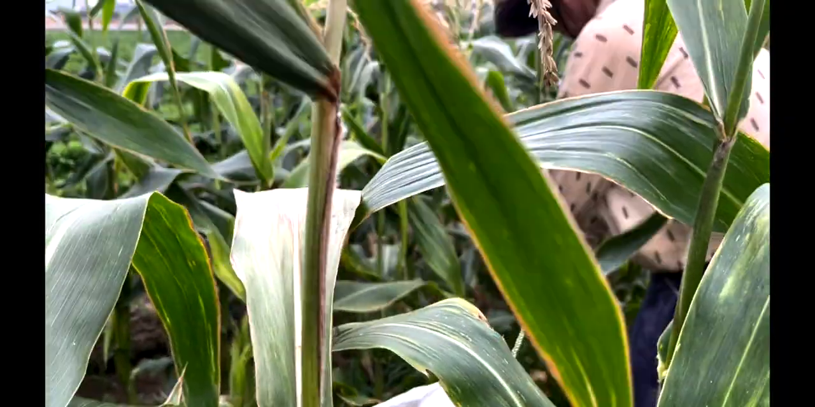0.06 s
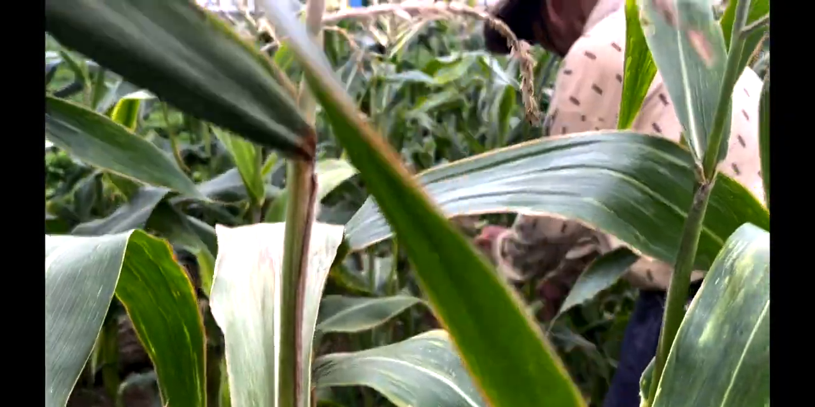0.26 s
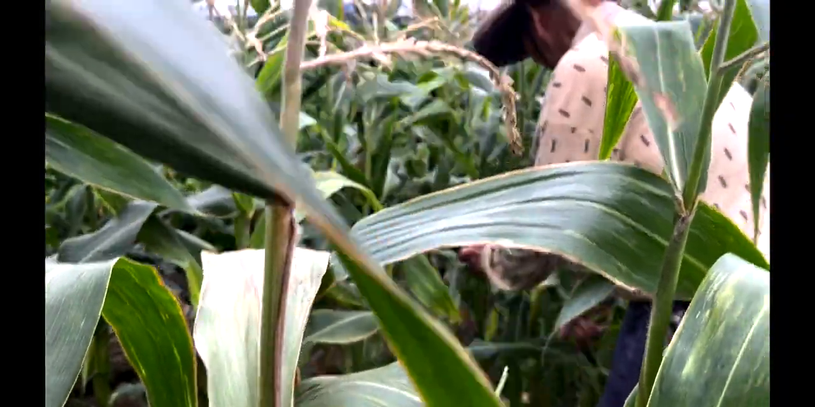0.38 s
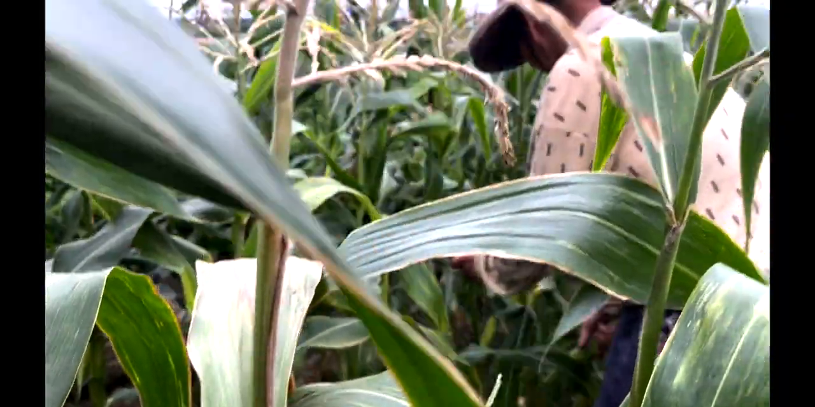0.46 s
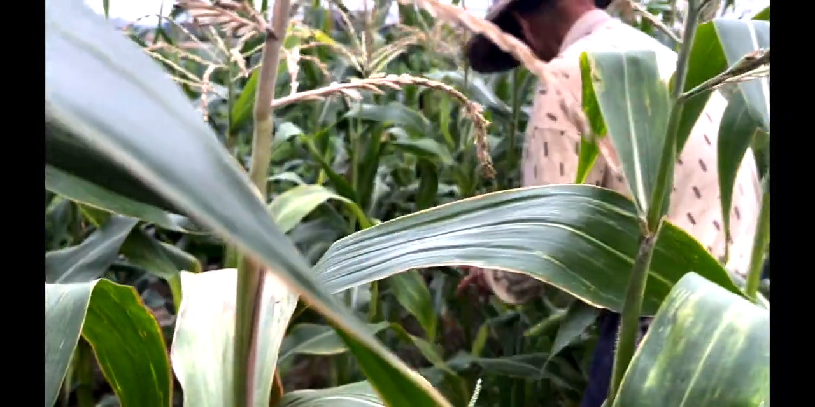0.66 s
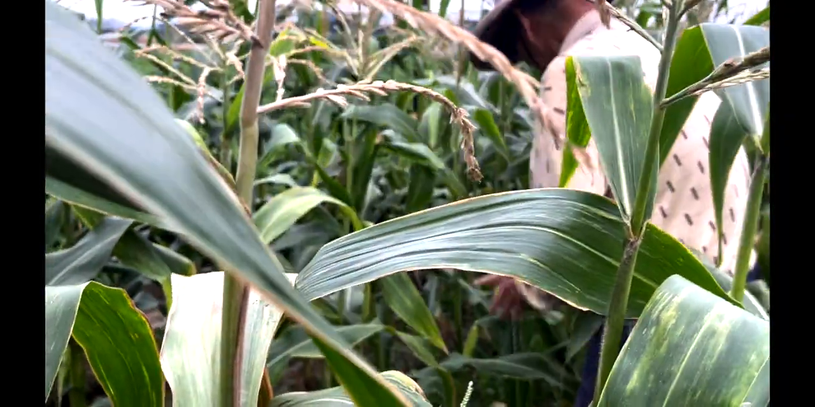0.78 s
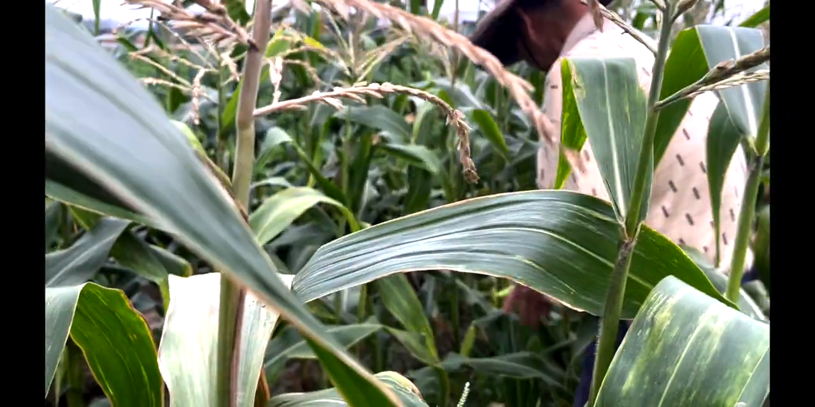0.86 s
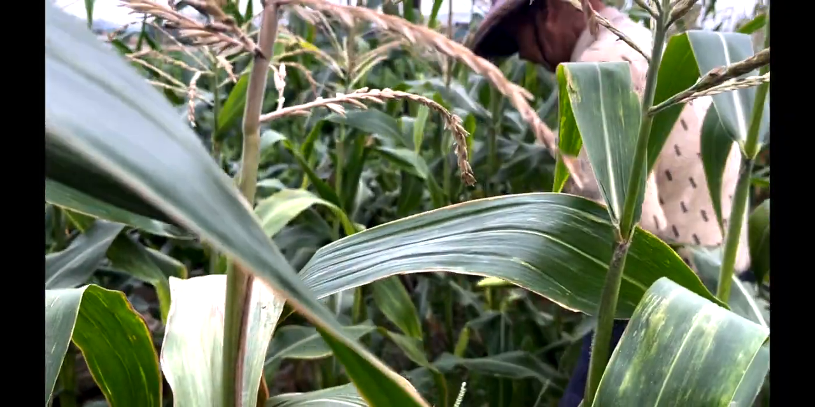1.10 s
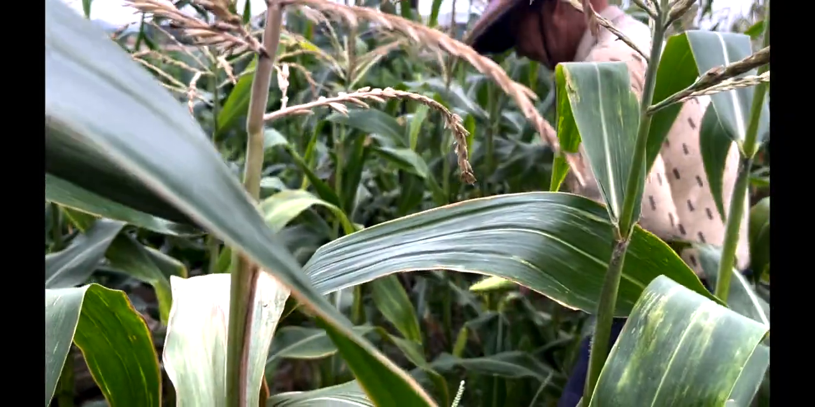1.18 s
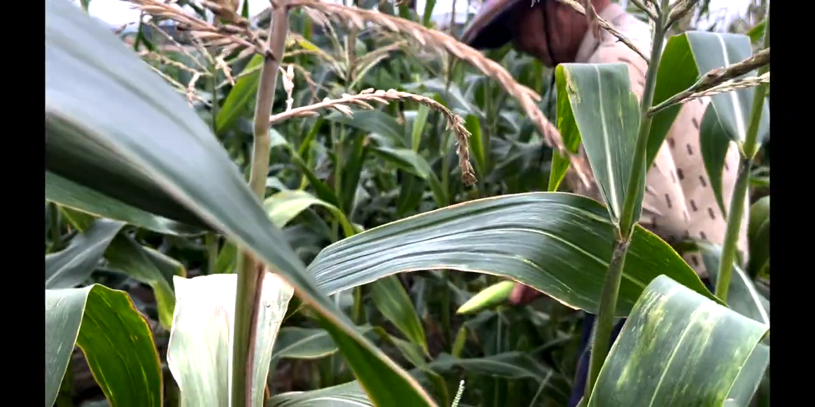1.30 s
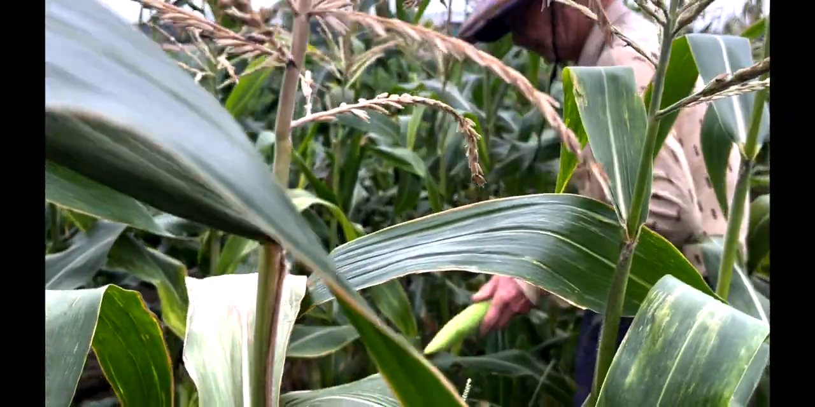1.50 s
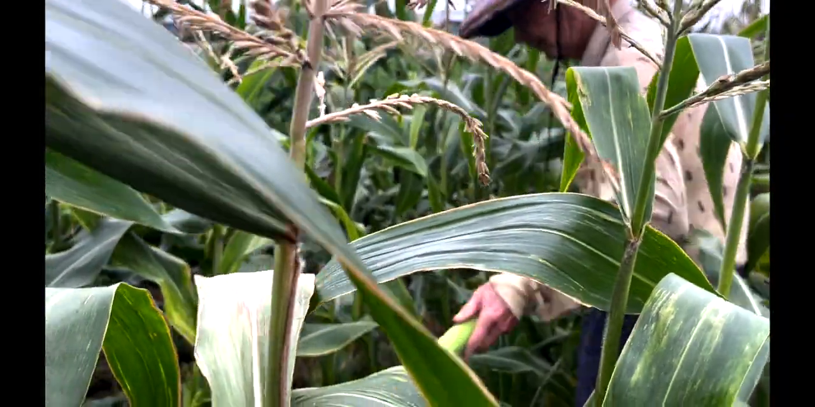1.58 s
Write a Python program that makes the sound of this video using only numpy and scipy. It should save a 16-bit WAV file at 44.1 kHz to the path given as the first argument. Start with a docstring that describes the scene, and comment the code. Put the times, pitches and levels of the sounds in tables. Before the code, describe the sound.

An ear of corn snaps off close by. Husk fibres crackle quickly from about 0.1 seconds with rustling leaves and hollow knocks, up to one sharp snap at 0.3. A knock and smaller cracks follow until 0.8, then only soft leaf brushing. A distant bird calls faintly from 0.1 to 0.8, and a faint cricket chirps four times between 0.6 and 1.6, over a low rumble of air.

```python
"""A cornfield in light air, one microphone close to a plant. A hand bends an ear of corn: husk fibres
crack one by one and the shank snaps, while leaves slide and the shaken plant knocks. The plants all
round scatter each click into a short tail. A cricket chirps and a bird, perhaps a rooster, calls once
far off, over a low rumble of air, a soft hiss and a faint hum."""
import sys
import numpy as np
from scipy import signal
from scipy.fft import rfft, irfft
from scipy.io import wavfile
from scipy.ndimage import uniform_filter1d

SR = 44100
rng = np.random.default_rng(int(sys.argv[2]) if len(sys.argv) > 2 else 0)


def generate_wav(signal):
    """Clip the signal to [-1, 1] and save it as 16-bit WAV at the path in sys.argv[1]."""
    frames = np.transpose(np.atleast_2d(signal))
    scaled = np.clip(frames, -1, 1) * 32767
    pcm = np.round(scaled).astype(np.int16)
    wavfile.write(sys.argv[1], SR, pcm)


N = 72765
T = np.arange(N) / SR


def amp(db):
    """Decibels to gain."""
    return 10 ** (np.asarray(db) / 20)


def unit(x):
    """Scale to rms 1."""
    return x / np.sqrt(np.mean(x ** 2))


def walk(per_s):
    """Smooth random drift with a spread near 1."""
    hold = int(SR / per_s)
    steps = np.repeat(rng.standard_normal(N)[:N // hold + 1], hold)
    return 1.477 * uniform_filter1d(uniform_filter1d(steps, hold), hold)[:N]


def swell(at, width):
    """Bell-shaped envelope that peaks at a given time."""
    return np.exp(-((T - at) / width) ** 2)


def sine(pitch):
    """A tone that follows a pitch curve in Hz."""
    return np.sin(2 * np.pi * np.cumsum(pitch) / SR)


def place(at, sound):
    """Start a short sound at a given time."""
    return np.concatenate([np.zeros(max(int(at * SR), 0)), sound, np.zeros(N)])[:N]


def through(x, response):
    """Pass a sound through an impulse response."""
    return signal.fftconvolve(x, response)[:N]


def colour(points, tilt=0, size=8192):
    """Causal response of unit energy with a (frequency [Hz], level [dB]) spectrum; tilt in dB/octave."""
    hz, db = np.array(points, float).T
    octave = np.log2(np.maximum(np.arange(size // 2 + 1) * SR / size, 1))
    db = np.interp(octave, np.log2(hz), db) + tilt * np.clip(octave, np.log2(hz[0]), np.log2(hz[-1]))
    cepstrum = irfft(np.log(amp(db)))[:size // 2]
    cepstrum[0] = 0
    response = irfft(np.exp(rfft(2 * cepstrum, size)))  # minimum phase
    return response / np.linalg.norm(response)


def tail(t60):
    """Dense noise of unit energy that fades by 60 dB in t60 seconds."""
    decay = np.exp(-np.log(1000) * T[:N // 2] / t60)
    response = (rng.standard_normal(N // 2) * decay)[:int(t60 * SR) + 2]
    return response / np.linalg.norm(response)


def scatter(x, t60, db):
    """A sound plus its reflections from the plants."""
    return x + amp(db) * through(x, tail(t60))


def air():
    """Light air over the field: a low rumble and a soft, gently wavering hiss."""
    # spectra of the hiss and the rumble (frequency [Hz], level [dB])
    hiss_colour = [(88, -34.5), (150, -3.5), (509, -8.5), (572, -9.5), (1290, -16.5), (2980, -15.5),
                   (6230, -21.5), (7860, -21), (12000, -19.5), (15500, -28)]
    rumble_colour = [(12, -11.5), (25, -1), (40, -3), (54, 0.5), (75, -9), (100, -15), (150, -22),
                     (250, -34), (600, -69.5)]
    hiss = unit(through(rng.standard_normal(N), colour(hiss_colour)))
    rumble = unit(through(rng.standard_normal(N), colour(rumble_colour)))
    return amp(-68.5 + 0.7 * walk(per_s=8)) * hiss + amp(-54.5) * rumble


def hum(hz=277):
    """A faint hum comes and goes, drifting a little in pitch."""
    # swells of the hum (peak time [s], width [s], level [dB])
    swells = [(.11, 0.073, -68.5), (.85, 0.19, -75), (1.3, 0.13, -73)]
    envelope = sum(amp(db) * swell(at, width) for at, width, db in swells)
    return envelope * sine(hz * (1 + 0.015 * walk(per_s=3.93)))


def friction(catches_per_s=5000, spread_db=2):
    """Rough blades catch and slip thousands of times a second."""
    catches = (rng.random(N) < catches_per_s / SR) * rng.standard_normal(N)
    strength = amp(spread_db * np.minimum(rng.exponential(size=N), 4))
    return unit(scatter(catches * strength, t60=0.024, db=1))


def leaves(flutter_db=1.5):
    """Leaves slide over each other and over a sleeve; broad ones brush more dully."""
    # slides (peak time [s], rise [s], fall [s], level [dB], tilt [dB/octave])
    slides = [(0.015, 0.075, 0.024, -52.5, -2), (0.045, 0.012, 0.012, -53.5, 2.5),
              (.08, 0.024, 0.085, -60, -1.5), (.235, 0.047, 0.015, -54, -2.5),
              (0.261, 0.018, 0.017, -45, 0), (0.294, 0.018, 0.023, -42, -1),
              (0.363, 0.025, 0.034, -55.5, -2.5), (0.422, 0.028, 0.016, -54.5, -1.5),
              (0.473, 0.03, 0.054, -54, -2.5), (0.523, 0.015, 0.017, -55, -3),
              (0.571, 0.026, 0.038, -58, -0.5), (0.619, 0.045, 0.047, -61.5, -2.5),
              (0.709, 0.021, 0.014, -60, -1.5), (0.736, 0.02, 0.027, -58.5, -1.5),
              (.86, 0.22, 0.054, -72.5, -3.5), (1.12, 0.018, 0.035, -66.5, -4),
              (1.385, 0.083, 0.073, -64, -1.5), (1.63, 0.03, 0.033, -68, -3)]
    # soft brushes of broad leaves (peak time [s], width [s], level [dB])
    brushes = [(0.428, .013, -55), (1.2, 0.058, -71.5), (1.405, 0.04, -69.5)]
    # spectra of a slide and a brush (frequency [Hz], level [dB])
    slide_colour = [(150, -20.5), (400, -7.5), (700, -3.5), (1000, -2.5), (2200, -1.5), (3500, 0.5),
                    (5500, -2.5), (8500, 1), (12800, 0.5), (15500, -25.5)]
    brush_colour = [(500, -17), (1500, -1.5), (2300, -1), (3700, 4), (5500, -22), (12000, -26)]
    sliding = 0
    for at, rise, fall, db, tilt in slides:
        stroke = swell(at, np.where(T < at, rise, fall))
        sliding += amp(db) * through(friction() * stroke, colour(slide_colour, tilt))
    pressure = sum(amp(db) * swell(at, width) for at, width, db in brushes)
    brushing = through(friction() * pressure, colour(brush_colour))
    return (sliding + brushing) * amp(flutter_db * walk(per_s=120))


def far_bird(hoarseness=0.06):
    """One faint, hoarse call rises, holds and sinks away, blurred by distance."""
    # course of the call (time [s], pitch [Hz], level [dB])
    call = [(0.085, 600, -73), (0.156, 716, -66), (0.379, 757, -76), (0.481, 754, -72), (0.64, 715.5, -65),
            (.73, 624, -78), (0.85, 538, -93)]
    at, hz, db = np.array(call).T
    pitch = np.interp(T, at, hz) * (1 + hoarseness * walk(per_s=220))
    envelope = amp(np.interp(T, at, db)) * (T > at[0]) * (T < at[-1])
    return scatter(envelope * sine(pitch), t60=0.3, db=-4)


def cracks():
    """Each fibre breaks with a click, a brief tear and its own short tail from the plants nearby."""
    # husk fibres and leaf ribs breaking (time [s], level [dB], tilt [dB/octave])
    breaks = [(.0999, -31.5, -1.5), (0.1873, -28.5, 1), (0.2006, -26.5, 4.5), (.2170, -24, 4.5),
              (0.2189, -25, -2), (0.2318, -20.5, 2), (.2410, -27, -3), (0.2528, -29, -3),
              (0.2557, -19.5, 3.5), (0.2587, -29, 5), (0.2623, -22, 0.5), (0.2639, -30, -6),
              (0.2797, -26, -1.5), (0.283, -21.5, -2.5), (.2862, -24, -3), (.2900, -24, -3),
              (0.2964, -20, 0.5), (0.3274, -29, -5), (.4146, -38, -4), (0.4214, -29, -3.5),
              (0.4423, -32, -3.5), (0.467, -34.5, -10), (0.7159, -37, -2), (0.7379, -41, -2.5),
              (0.7898, -46, 0.5), (1.5549, -44, -6.5)]
    # spectrum of a crack (frequency [Hz], level [dB])
    crack_colour = [(150, -18.5), (400, -30), (650, -6.5), (1000, -17), (2000, -0.5), (3200, 4.5),
                    (5500, -2.5), (8200, 2.5), (10000, -3.5), (13000, -3), (15500, -19)]
    out = 0
    for at, db, tilt in breaks:
        click = disperse(colour(crack_colour, tilt))
        tear = place(at, through(click, tail(t60=0.005)))
        reflections = amp(4) * place(at, through(click, tail(t60=0.065)))
        out += amp(db - 0.5) * (place(at, click) + tear + reflections)
    return out


def disperse(x, lagging_hz=2730, width_hz=1050):
    """Bending waves in the stalk spread a click into a few quick swings (an all-pass)."""
    radius = np.exp(-np.pi * width_hz / SR)
    feedback = [1, -2 * radius * np.cos(2 * np.pi * lagging_hz / SR), radius ** 2]
    return signal.lfilter(feedback[::-1], feedback, x)


def knocks():
    """Broad leaves and stalks bump with a hollow, papery sound, each at its own pitch."""
    # bumps of the shaken plant (time [s], level [dB], pitch [ratio])
    bumps = [(.218, -26, 0.98), (.255, -23, 1.08), (.4212, -23.5, 1.24), (1.114, -40, 1)]
    # spectrum of a knock (frequency [Hz], level [dB])
    knock_colour = [(100, -29), (330, -10), (510, -9), (620, 6), (800, -7), (1300, -5), (2200, -4),
                    (6000, -57)]
    out = 0
    for at, db, ratio in bumps:
        body = colour([(hz * ratio, level) for hz, level in knock_colour])
        out += amp(db) * place(at, through(tail(t60=0.052), body))
    return out


def snap(echo_lag_s=0.0015):
    """The shank breaks in quick steps; the stalk rings and the nearest leaves return a brighter tail."""
    # steps of the fracture (time [s], level [dB])
    steps = [(.3312, 0), (.33168, -6), (.3333, -9), (.3347, -11)]
    # spectrum of a step (frequency [Hz], level [dB])
    snap_colour = [(150, -33), (400, -15), (800, -5.5), (1100, -7.5), (1400, 2), (2100, 3), (2900, -1.5),
                   (3650, 4), (4600, -6), (8000, -11), (12500, -17), (15500, -41)]
    # modes of stalk and ear (frequency [Hz], level [dB], t60 [s])
    modes = [(325, -3, 0.24), (1410, 16, 0.079), (1680, 16, 0.078), (3460, 3, 0.11), (3800, 24, 0.1)]
    start = steps[0][0]
    fracture = sum(amp(db) * place(at, colour(snap_colour)) for at, db in steps)
    ring = sum(amp(db) * np.sin(2 * np.pi * hz * T) * np.exp(-np.log(1000) * T / t60)
               for hz, db, t60 in modes)
    ring = amp(-13) * place(start, ring / np.linalg.norm(ring))
    bright_tail = through(tail(t60=0.064), colour(snap_colour, tilt=2.5))
    reflections = amp(-0.3) * place(start + echo_lag_s, bright_tail)
    return amp(-2.8) * (disperse(fracture) + reflections + ring)


def cricket(chirp_s=0.068, rise_hz_per_s=1800, roughness=0.2):
    """Short, slightly rising tones, about three a second, each with its own accent and a soft tail."""
    # chirps (start time [s], accent after the start [s], pitch [Hz], level [dB])
    chirps = [(0.618, .016, 5490, -60.5), (.916, .038, 5465, -64.5), (1.216, .014, 5420, -68.5),
              (1.522, .026, 5440, -66.5)]
    out = 0
    for at, accent, hz, db in chirps:
        age = np.clip(T - at, 0, chirp_s)
        pitch = hz + rise_hz_per_s * age + 15 * walk(per_s=149)
        envelope = np.interp(age, [0, accent, chirp_s], [0, 1, 0])
        out += amp(db) * scatter(envelope * sine(pitch), t60=0.3, db=-8)
    return out * (1 + roughness * walk(per_s=150))


def swish(band_hz=(8700, 13000)):
    """One blade sweeps lightly along another: a broad, high hiss."""
    band = signal.butter(2, band_hz, "bandpass", fs=SR, output="sos")
    hiss = unit(signal.sosfilt(band, friction()))
    return amp(-62.5) * hiss * swell(at=1.231, width=0.059)


def scene():
    """The plant close to the microphone, with the open field behind it, in mono."""
    plant = leaves() + cracks() + knocks() + snap() + swish()
    field = air() + hum() + far_bird() + cricket()
    return (scatter(plant, t60=0.18, db=-22.5) + field)[None]


def record(dry, top_hz=15700):
    """The recorder cuts the highest treble steeply."""
    return signal.sosfilt(signal.ellip(8, 0.2, 70, top_hz, fs=SR, output="sos"), dry)


dry = scene()
out = record(dry)
generate_wav(out)
```